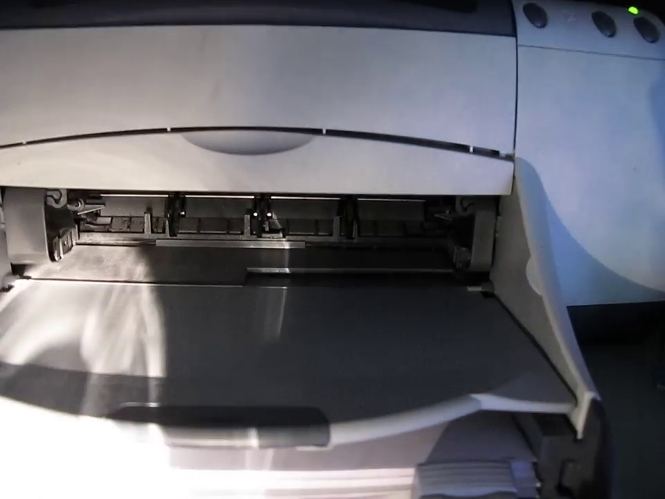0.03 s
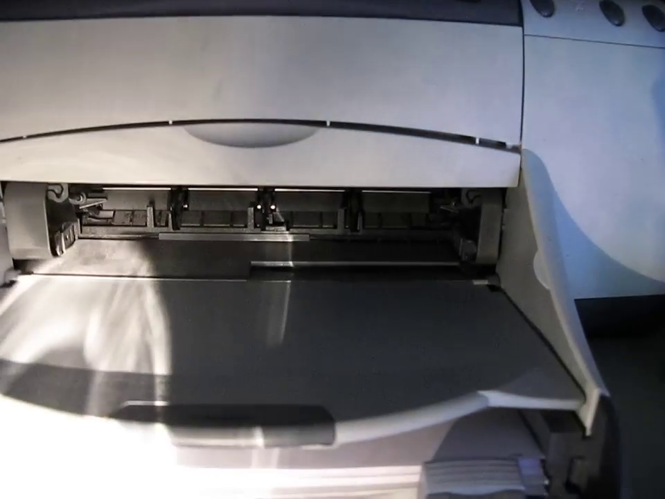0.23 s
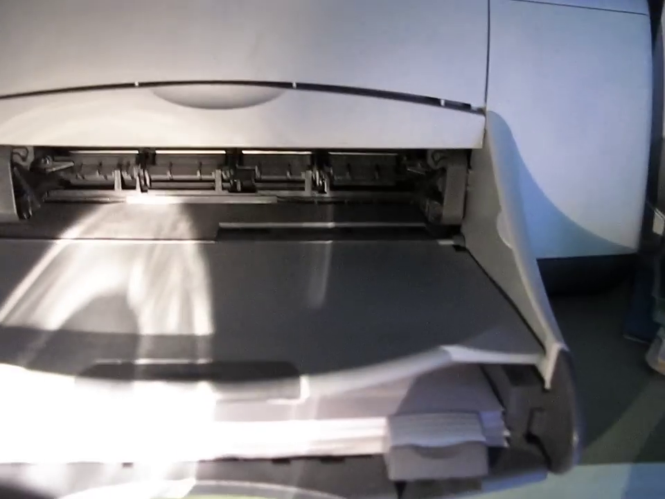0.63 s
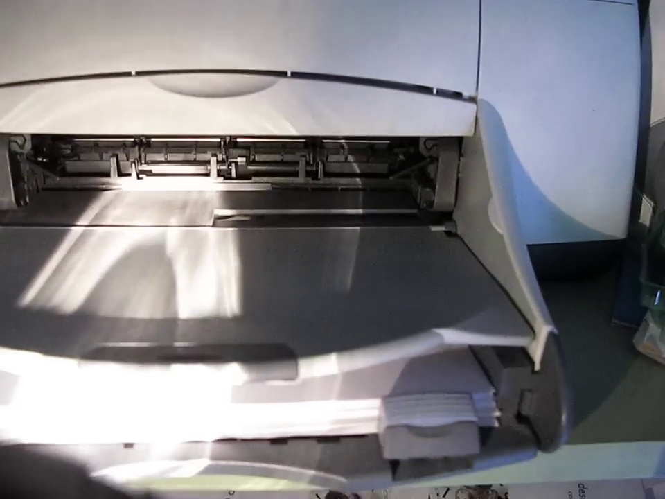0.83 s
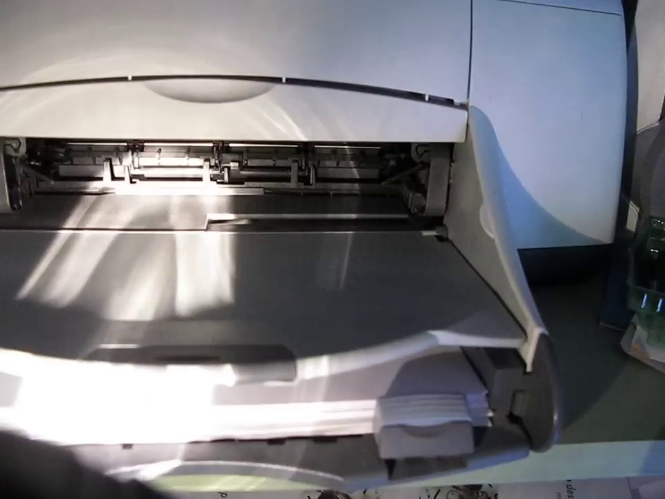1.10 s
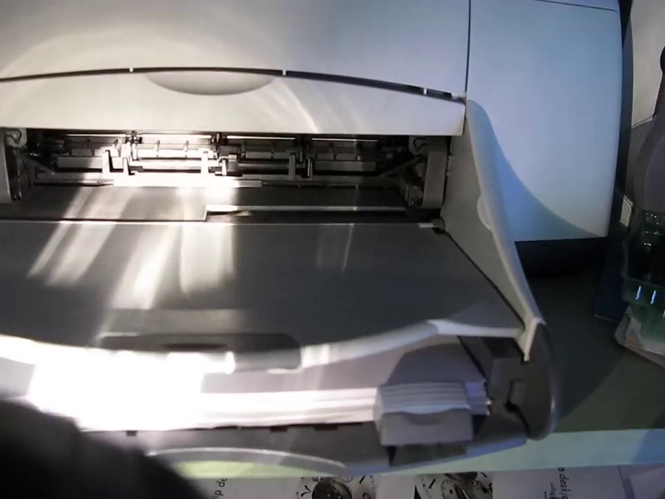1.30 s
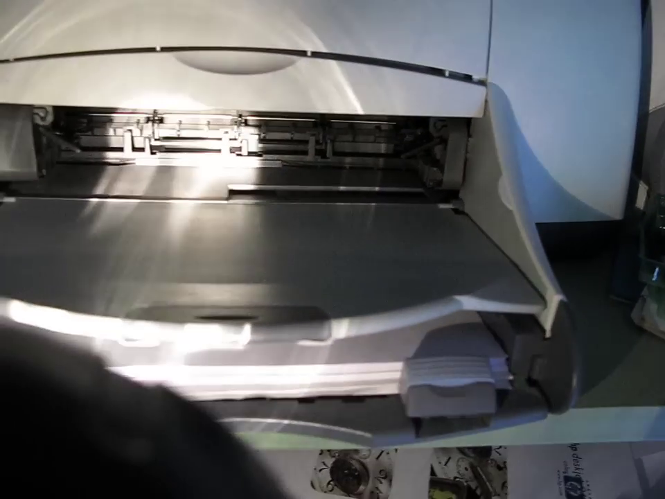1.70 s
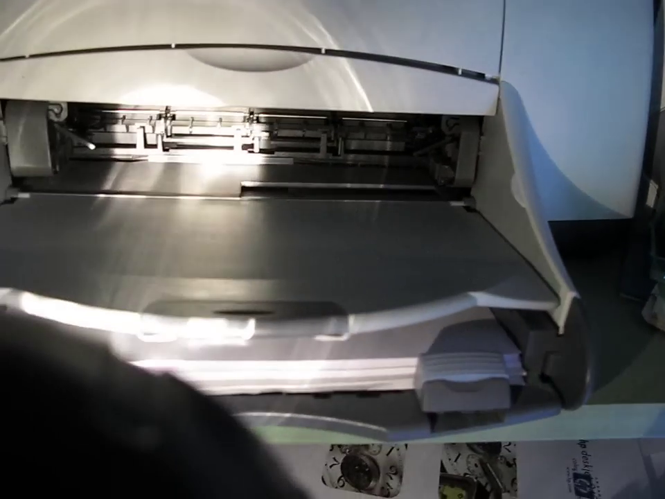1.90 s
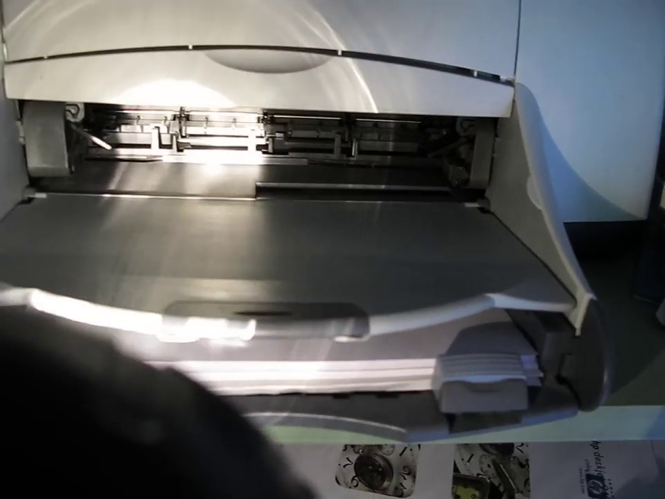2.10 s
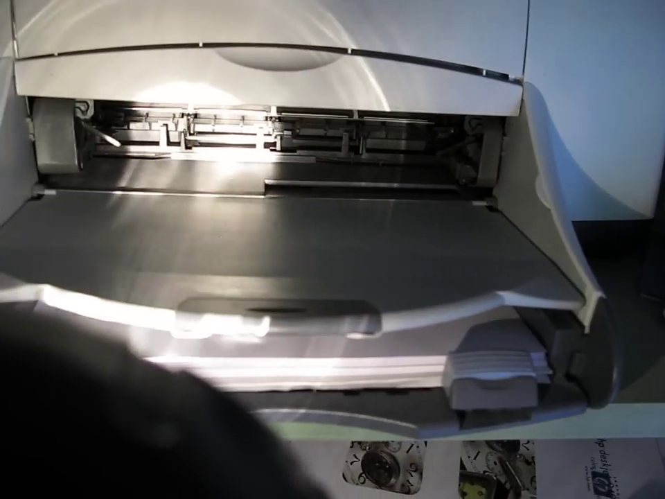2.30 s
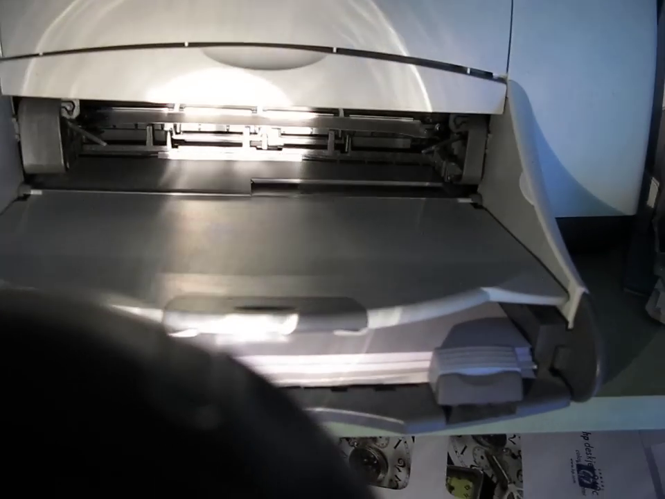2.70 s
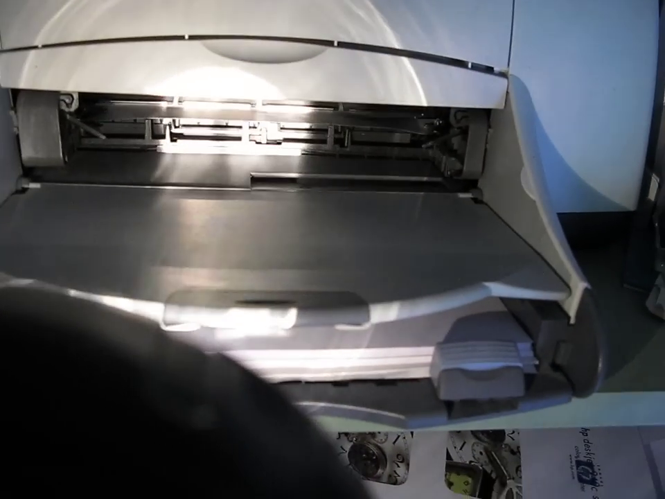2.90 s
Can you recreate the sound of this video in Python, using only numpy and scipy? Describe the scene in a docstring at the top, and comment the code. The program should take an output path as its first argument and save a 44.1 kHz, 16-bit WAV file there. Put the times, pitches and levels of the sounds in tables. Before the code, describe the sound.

An inkjet printer clacks and whirs, then feeds a sheet of paper with a hiss.

```python
"""An inkjet printer feeds a sheet, heard from in front of its open tray in a small, humming room.
A motor whines up and turns plastic gears; levers snap, rattle and knock in the ringing case.
About a second in, paper starts to rub through squeaking rollers, and the feed motor's drone joins.
The sheet stops for an instant, is pulled on with a loud hiss, and the drive eases off in thin whines."""
import sys
import numpy as np
from scipy import signal
from scipy.fft import rfft, irfft, next_fast_len
from scipy.io import wavfile
from scipy.ndimage import uniform_filter1d

SR = 44100
rng = np.random.default_rng(int(sys.argv[2]) if len(sys.argv) > 2 else 0)


def dump(signal):
    """Clip the signal to [-1, 1] and save it as 16-bit WAV at the path in sys.argv[1]."""
    limited = np.clip(np.atleast_2d(signal).T, -1, 1)
    pcm = np.round(limited * 32767).astype(np.int16)
    wavfile.write(sys.argv[1], SR, pcm)


N = 134505


def undb(db):
    return 10 ** (np.asarray(db) / 20)


def clock(size):
    """Time axis in seconds."""
    return np.arange(size) / SR


def colour(x, points, tilt=0, peaks_hz=(), peak_db=0, width_hz=100):
    """Causal EQ of unit power: a curve, a tilt in dB per octave above 600 Hz, and resonances."""
    size = 2 * next_fast_len(len(x) // 2 + 1024)
    bins = np.maximum(np.arange(size // 2 + 1) * SR / size, 10)
    hz, db = np.array(points, float).T
    curve = np.interp(np.log2(bins), np.log2(hz), db) + tilt * np.log2(np.maximum(bins, 600))
    gain = undb(curve + sum(peak_db / (1 + ((bins - f) / width_hz) ** 2) for f in peaks_hz))
    cepstrum = irfft(np.log(gain / np.sqrt(np.mean(gain ** 2))))
    cepstrum[1:size // 2] *= 2  # minimum phase keeps attacks sharp
    cepstrum[size // 2 + 1:] = 0
    return irfft(rfft(x, size) * np.exp(rfft(cepstrum)), size)[:len(x)]


def drift(rate_hz, size=N):
    """Smooth random wander with a spread near 1."""
    step = max(int(SR / rate_hz), 1)
    return uniform_filter1d(np.repeat(rng.standard_normal(size // step + 1), step), step)[:size]


def grains(size, per_s, scatter_db):
    """Random tiny impacts of uneven strength, rms 1."""
    clicks = (rng.random(size) < per_s / SR) * np.sign(rng.standard_normal(size))
    clicks *= undb(scatter_db * rng.standard_normal(size))
    return clicks / np.sqrt(np.mean(clicks ** 2) + 1e-12)


def gate(start, end, fade_s=0.026):
    """Fade in, hold, fade out."""
    t = clock(N)
    return np.clip(np.minimum(t - start, end - t) / fade_s, 0, 1)


def hit(t, rise_s, t60_s):
    """Fast rise, exponential decay."""
    return np.minimum(t / rise_s, 1) * np.exp(-np.log(1000) * np.maximum(t - rise_s, 0) / t60_s)


def stroke(t, length_s, swell_db, release_s, attack_s=0.006):
    """Attack, a hold that swells or sags, release."""
    hold = undb(swell_db * np.minimum(t / length_s, 1))
    return np.minimum(t / attack_s, 1) * hold * np.exp(-np.maximum(t - length_s, 0) / release_s)


def add(out, start, x):
    """Mix x into out from a start time."""
    i = max(int(start * SR), 0)
    out[i:i + len(x)] += x[:max(N - i, 0)]


def room_tone(air_db=-50.5, hum_hz=118.6, hum_db=-61):
    """A bed of still air and faint mains hum."""
    # Air spectrum: frequency_hz, gain_db
    air_eq = [(25, -7), (60, -5), (100, 6.5), (160, 3), (300, 6), (700, 7.5), (1500, 1), (3000, -3.5),
              (7000, -7.5), (13000, -11), (15800, -21)]
    air = undb(air_db) * colour(rng.standard_normal(N), air_eq)
    return air + undb(hum_db) * np.sqrt(2) * np.sin(2 * np.pi * hum_hz * clock(N))


def whines(wander_hz=18, flutter_db=3.5):
    """Unsteady motor and gear tones come and go as the drive changes speed."""
    # Gliding tones: start_s, end_s, from_hz, to_hz, level_db
    glides = [(0.073, 0.126, 892, 944, -49), (0.728, 0.857, 1195, 1220, -50),
              (1.556, 1.78, 12000, 12100, -57), (2.885, 2.947, 428, 498, -48.5),
              (2.945, 3.015, 480, 579, -45), (2.9, 2.98, 975, 938, -45), (2.955, 3.003, 1014, 1095, -50)]
    out, t = np.zeros(N), clock(N)
    for start, end, from_hz, to_hz, db in glides:
        hz = np.interp(t, [start, end], [from_hz, to_hz]) + wander_hz * drift(60)
        envelope = undb(db + flutter_db * drift(110)) * gate(start, end)
        out += envelope * np.sqrt(2) * np.sin(2 * np.pi * np.cumsum(hz) / SR)
    return out


def gears(shaft_hz=17, throb_db=1, flutter_db=1.3):
    """Tooth contacts whirr with the motor's effort and throb once a shaft turn."""
    # Effort of the gear train: time_s, level_db
    effort = [(.195, -83), (.21, -32.5), (.3, -40), (.39, -36), (.48, -36), (.57, -32.5), (.8, -35.5),
              (1.04, -35.5), (1.12, -38), (1.142, -41.5), (1.19, -35.5), (1.31, -41), (1.342, -49),
              (1.39, -34), (1.5, -38), (1.75, -35.5), (2.39, -36.5), (2.412, -56), (2.43, -32.5),
              (2.76, -46), (2.86, -47), (3.05, -49.5)]
    # Whirr spectrum: frequency_hz, gain_db
    gear_eq = [(50, -59.5), (140, -10), (220, -7), (360, -11.5), (520, 2), (700, 3), (1200, -1.5),
               (1700, -2), (3000, -5.5), (4500, -10), (7000, -14.5), (12000, -13.5), (15800, -24)]
    t = clock(N)
    db = np.interp(t, *np.array(effort).T)
    db += throb_db * np.sin(2 * np.pi * shaft_hz * t) + flutter_db * drift(90)
    teeth = 0.67 * grains(N, per_s=4000, scatter_db=2) + 0.54 * rng.standard_normal(N)
    return colour(teeth * undb(db), gear_eq)


def levers(shudder_hz=1310):
    """Each blow is a short crack with its part's ring, then a duller shudder of the case."""
    # Lever blows: start_s, level_db, rise_s, tilt_db_per_octave, low_ring_hz, high_ring_hz, ring_db
    blows = [(0.203, -34, 0.00088, 3, 6000, 13200, 3), (0.228, -18.5, 0.0028, 2.8, 10700, 13300, 3.8),
             (0.3121, -17, 0.0029, 3, 8500, 13000, 4.9), (0.344, -16.5, 0.00058, 5, 8600, 10500, 10),
             (0.4306, -22, 0.0012, -3, 780, 2800, 2), (0.443, -23.5, .002, -0.5, 3780, 13000, 14),
             (0.4597, -27.5, 0.0013, -3.5, 5000, 11500, 4), (0.5971, -19, 0.0015, 4.5, 6000, 8370, 4.5),
             (0.612, -17.5, 0.00051, 1, 2100, 10900, 8.2), (.6672, -21.5, 0.00068, 1.3, 610, 11400, 13.5),
             (0.775, -20.5, 0.00085, 6.5, 12900, 13950, 6.7), (0.8737, -22, 0.0034, -4, 1980, 3850, 7.6),
             (1.009, -26.5, 0.0023, -2.5, 3700, 5800, 11), (1.0508, -10.5, 0.0025, 0.6, 7250, 13740, 7.2),
             (1.1506, -28, 0.0015, -2.5, 2500, 4500, 1), (1.157, -15.5, 0.0031, -2.1, 4700, 8480, 8.9),
             (1.3493, -20.5, 0.0034, -4, 2500, 5200, 3.4), (1.3529, -16, 0.0065, -2, 1140, 2650, 3.5),
             (1.919, -25.5, 0.0025, -1, 8060, 10500, 5)]
    # Blow spectrum: frequency_hz, gain_db
    blow_eq = [(60, -37), (150, -16), (260, -10), (700, 3.5), (2000, 1.5), (4000, -0.5), (9000, -2.5),
               (13300, -4.5), (15800, -15)]
    out, t = np.zeros(N), clock(SR // 4)
    lowpass = signal.butter(1, shudder_hz, fs=SR)
    for start, db, rise, tilt, low_hz, high_hz, ring_db in blows:
        shudder = signal.lfilter(*lowpass, hit(t, rise, t60_s=0.2) * rng.standard_normal(len(t)))
        crack = hit(t, rise, t60_s=0.022) * rng.standard_normal(len(t))
        body = hit(t, rise, t60_s=0.055) * rng.standard_normal(len(t))
        snap = undb(-1.5) * crack + 0.7 * body + undb(-9) * shudder
        add(out, start, undb(db) * colour(snap, blow_eq, tilt, (low_hz, high_hz), ring_db, width_hz=450))
    return out


def rattles():
    """Gears and cams engage in bursts of chattering teeth over a scrape."""
    # Chatter bursts: start_s, end_s, level_db, swell_db, tilt_db_per_octave, peak_hz, peak_db
    bursts = [(0.204, 0.246, -36, -2, -1.5, 230, 12.5), (0.232, 0.258, -29, 0.5, -3, 650, 0),
              (0.317, 0.335, -22, -6, -5.5, 507, -4), (0.344, 0.37, -18.5, -0.5, 1, 480, 6),
              (0.379, 0.417, -29.5, -7, -4.5, 510, 2), (0.432, 0.454, -22, -0.5, -2.6, 740, -11),
              (0.496, 0.565, -27.5, -11.5, -1.5, 1970, 8), (.613, 0.658, -19.5, -5.5, 1, 2000, -4),
              (0.655, 0.678, -30.5, 0, -1, 640, 7), (0.699, 0.739, -33, 9.5, 0, 1310, 8),
              (0.891, 0.912, -32.5, 3.5, -1.5, 1210, 1), (1.363, 1.399, -26, -10.5, -2, 240, 13),
              (1.791, 1.897, -30, -1.5, 3, 1280, 10), (1.894, 2.05, -36.5, -9.5, -3, 220, 12),
              (2.42, 2.434, -23.5, -0.5, 2.5, 201, 3), (2.72, 2.761, -28.5, -3.5, 0.5, 1190, 5.5),
              (2.764, 2.838, -39.5, -10.5, -9.5, 278, 9)]
    # Chatter spectrum: frequency_hz, gain_db
    rattle_eq = [(60, -75), (150, -19), (240, -1), (350, -7.5), (550, 2), (1200, 4), (2500, 1.5),
                 (4500, -6.5), (8000, -9.5), (11000, -7), (13500, -17), (15800, -17)]
    out, t = np.zeros(N), clock(SR // 4)
    for start, end, db, swell_db, tilt, peak_hz, peak_db in bursts:
        chatter = 0.39 * grains(len(t), per_s=1200, scatter_db=2) + 0.66 * rng.standard_normal(len(t))
        chatter *= stroke(t, end - start, swell_db, release_s=0.0056)
        add(out, start, undb(db) * colour(chatter, rattle_eq, tilt, [peak_hz], peak_db, width_hz=130))
    return out


def knocks():
    """A panel struck by a lever or cam sounds one hollow, heavily damped note."""
    # Panel strikes: start_s, level_db, pitch_hz
    strikes = [(.243, -23, 686), (.353, -23, 493), (.371, -21, 532), (.448, -20, 760), (.62, -21, 2070),
               (.623, -20, 710), (.729, -22, 1254), (.876, -22, 721), (1.052, -18, 946),
               (1.0525, -20, 2074), (1.354, -13.5, 1240), (1.364, -23, 855)]
    out, t = np.zeros(N), clock(SR // 4)
    envelope = hit(t, rise_s=0.003, t60_s=0.035)
    for start, db, hz in strikes:
        add(out, start, undb(db) * envelope * np.sin(2 * np.pi * hz * t))
    return out


def paper(flutter_db=1):
    """Fibres catch and slip on rollers and guides so densely that the sheet hisses."""
    # Paper rubs: start_s, end_s, level_db, swell_db, tilt_db_per_octave, peak_hz, peak_db
    rubs = [(0.928, 1.05, -43, 1.5, -3, 3640, 9), (1.169, 1.33, -52, -3, 0, 11000, 4),
            (1.389, 1.77, -44.5, 0.5, 0.5, 11900, 2), (1.766, 1.973, -30, -5.5, -1.2, 1540, 7.5),
            (1.97, 2.398, -36.5, 0, -2.5, 2670, 5), (2.05, 2.19, -37, 2, -5.5, 3340, 3.5),
            (2.379, 2.386, -24, -4, -5.5, 5430, 6), (2.42, 2.446, -28.5, -4.5, 1.5, 4340, 11),
            (2.421, 2.607, -29, 4.5, 0.1, 4600, 3), (2.603, 2.752, -24.5, 0, -0.2, 3810, 2),
            (2.77, 3.047, -47.5, 3, 1.5, 5100, 3.5)]
    # Hiss spectrum: frequency_hz, gain_db
    paper_eq = [(100, -53), (370, -15), (650, -4), (2000, 0), (3200, 3.5), (5400, 2), (6500, 0), (8200, 2),
                (12000, 2), (13500, -2), (15800, -10.5)]
    out, t = np.zeros(N), clock(SR // 2)
    for start, end, db, swell_db, tilt, peak_hz, peak_db in rubs:
        slips = grains(len(t), per_s=15000, scatter_db=1.5) * undb(flutter_db * drift(151.7, len(t)))
        slips *= stroke(t, end - start, swell_db, release_s=0.0055)
        add(out, start, undb(db) * colour(slips, paper_eq, tilt, [peak_hz], peak_db, width_hz=1000))
    return out


def squeaks(width_hz=170):
    """Friction briefly excites one narrow resonance of a roller."""
    # Roller squeaks: start_s, end_s, pitch_hz, level_db
    cues = [(.97, 1.125, 3560, -46), (1.06, 1.15, 7320, -55), (1.78, 1.93, 3420, -42),
            (2.04, 2.21, 3260, -40), (2.5, 2.76, 4070, -37), (2.85, 3.05, 11200, -59)]
    out = np.zeros(N)
    for start, end, hz, db in cues:
        band = signal.butter(2, [hz - width_hz / 2, hz + width_hz / 2], "band", fs=SR, output="sos")
        squeak = signal.sosfilt(band, rng.standard_normal(N))
        out += undb(db) * gate(start, end) * squeak / squeak.std()
    return out


def drone(swell_s=0.024, rasp_hz=190, roughness=0.75):
    """The feed motor's rough note swells as each roller turn loads it."""
    # Load swells: centre_s, level_db, pitch_hz
    swells = [(1.454, -38.5, 670), (1.53, -39.5, 700), (1.632, -39, 650), (1.75, -37, 675),
              (1.831, -39, 630), (1.94, -35, 640), (2.067, -38, 690), (2.145, -41, 690), (2.273, -37, 675),
              (2.376, -38, 705), (2.445, -35.5, 620), (2.525, -41, 690), (2.612, -36, 630),
              (2.718, -38.5, 690)]
    t = clock(N)
    times, _, pitches = np.array(swells).T
    phase = 2 * np.pi * np.cumsum(np.interp(t, times, pitches)) / SR
    load = sum(undb(db) * np.exp(-((t - centre) / swell_s) ** 2) for centre, db, _ in swells)
    rasp = drift(rasp_hz) * np.sin(phase) + drift(rasp_hz) * np.cos(phase)
    return load * (np.sqrt(roughness) * rasp / rasp.std() + np.sqrt(2 * (1 - roughness)) * np.sin(phase))


def ring(x, modes):
    """A body passes the sound and rings on at its modes."""
    out = x.copy()
    for hz, t60, db in modes:
        q = np.pi * hz * t60 / np.log(1000)
        out += undb(db) * signal.lfilter(*signal.iirpeak(hz, q, fs=SR), x)
    return out


def bay(x, notch_hz=1750, width_hz=150, depth=0.45):
    """Cancellation in the open paper bay carves a narrow dip."""
    return x - depth * signal.lfilter(*signal.iirpeak(notch_hz, notch_hz / width_hz, fs=SR), x)


def room(x, t60_s=0.23, build_s=0.0095, wet_db=-19.5):
    """The walls return a short, dull tail."""
    t = clock(SR // 2)
    tail = rng.standard_normal(len(t)) * np.exp(-np.log(1000) * t / t60_s) * np.minimum(t / build_s, 1)
    tail = colour(tail / np.sqrt(np.sum(tail ** 2)), [(100, 0), (16000, 0)], tilt=-2.7)
    return x + undb(wet_db) * signal.fftconvolve(x, tail)[:N]


def scene():
    """The mechanism rings the case, the sheet rings the guides, and all of it spills into the room."""
    # Modes of the plastic case: pitch_hz, t60_s, gain_db
    case_modes = [(228, .17, 2), (520, .08, -9), (620, .12, -4), (712, .15, -1), (845, .2, -7),
                  (940, .14, -2), (1200, .12, -4), (2120, .06, -9)]
    # Modes of the rollers and paper guides: pitch_hz, t60_s, gain_db
    guide_modes = [(1570, .03, -8), (2420, .04, -11), (3250, .04, -7), (3435, .05, -6), (3720, .05, -7),
                   (4077, .05, 1), (5370, .025, -1), (7850, .009, -7)]
    mechanism = ring(levers() + rattles() + gears(), case_modes)
    sheet = ring(paper(), guide_modes)
    printer = mechanism + sheet + knocks() + whines() + drone() + squeaks()
    return (room(bay(printer)) + room_tone())[None]


def record(dry, low_cut_hz=46, high_cut_hz=15800):
    """The microphone drops the deep bass and cuts the top."""
    thin = signal.sosfilt(signal.butter(4, low_cut_hz, "high", fs=SR, output="sos"), dry)
    return signal.sosfilt(signal.ellip(10, .2, 75, high_cut_hz, fs=SR, output="sos"), thin)


dry = scene()
out = record(dry)
dump(out)
```